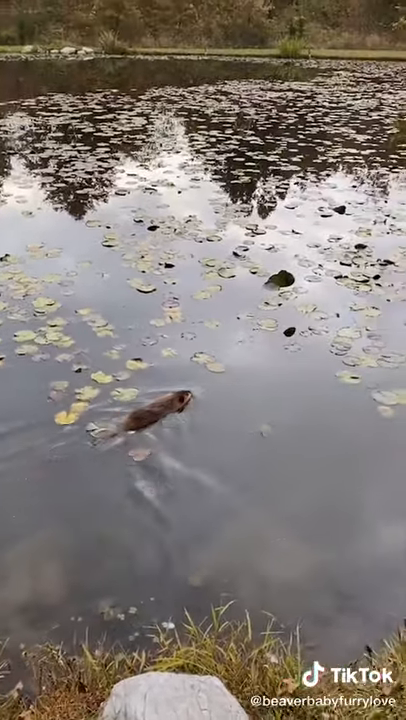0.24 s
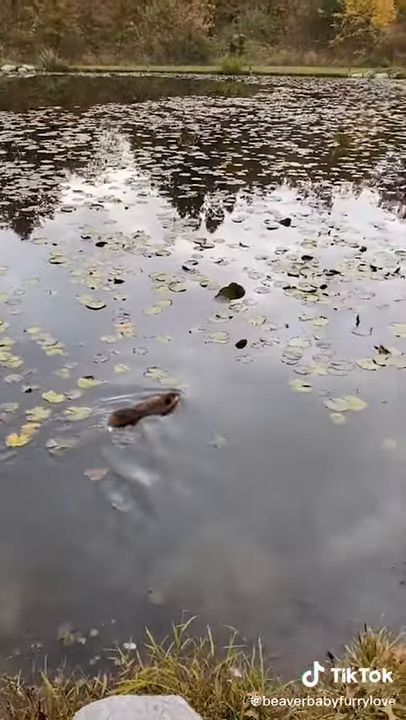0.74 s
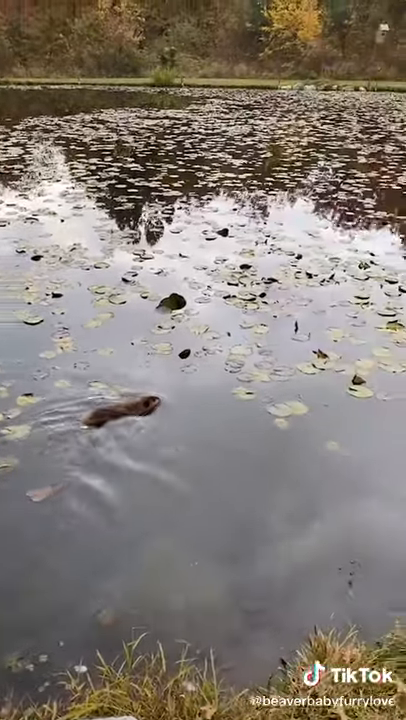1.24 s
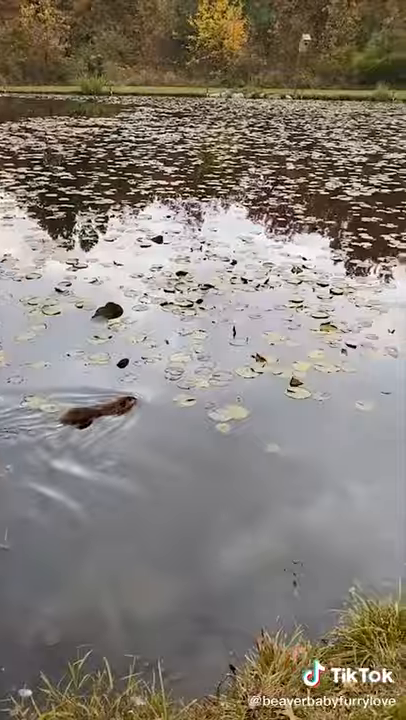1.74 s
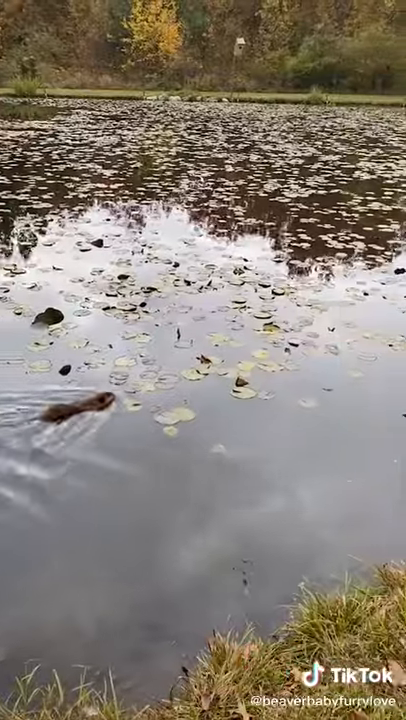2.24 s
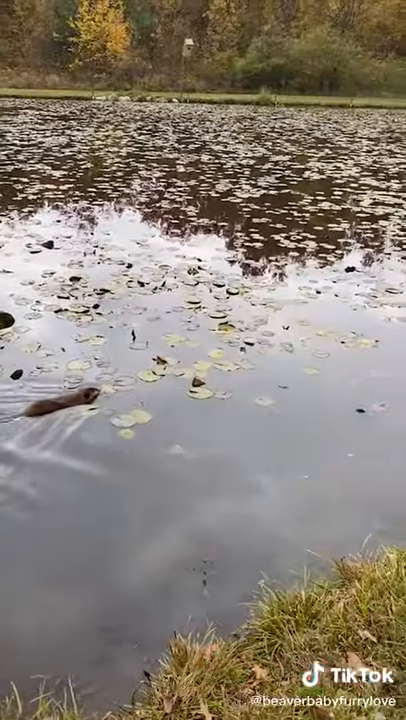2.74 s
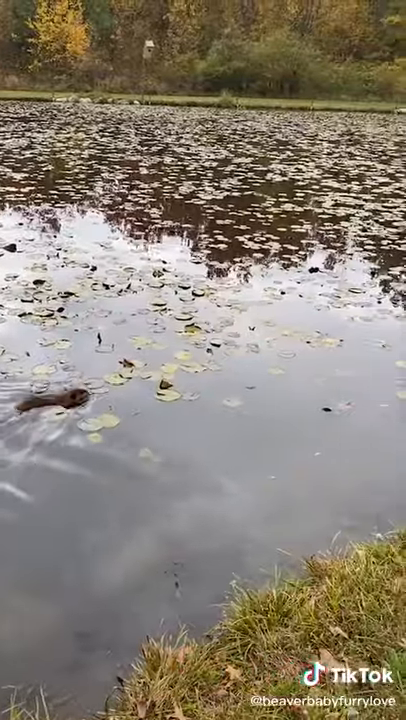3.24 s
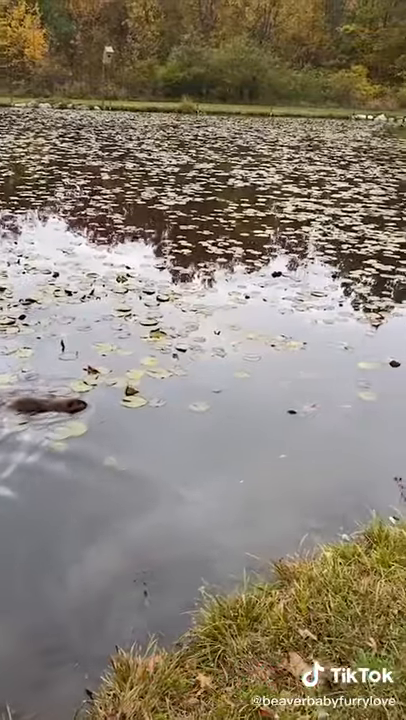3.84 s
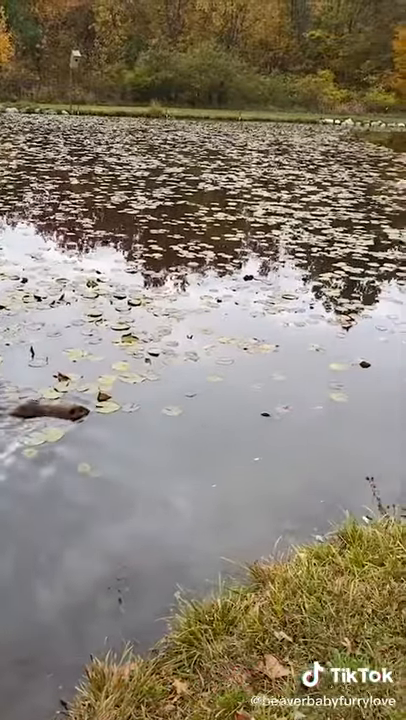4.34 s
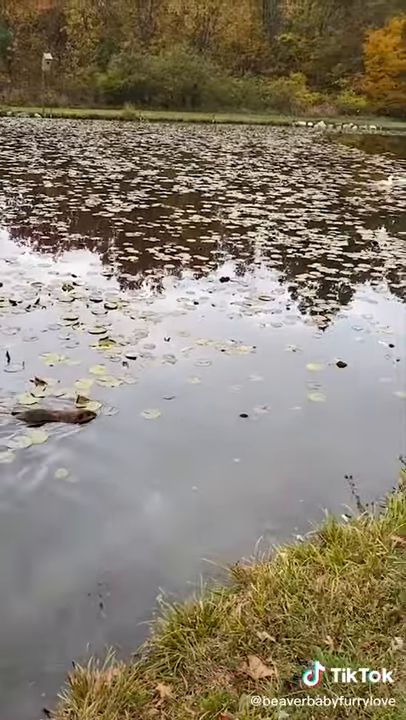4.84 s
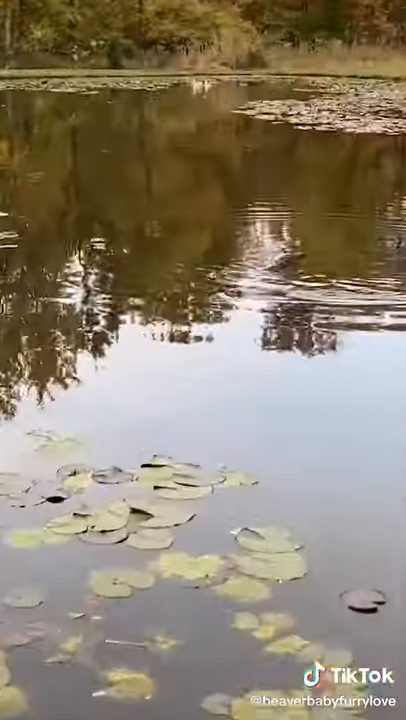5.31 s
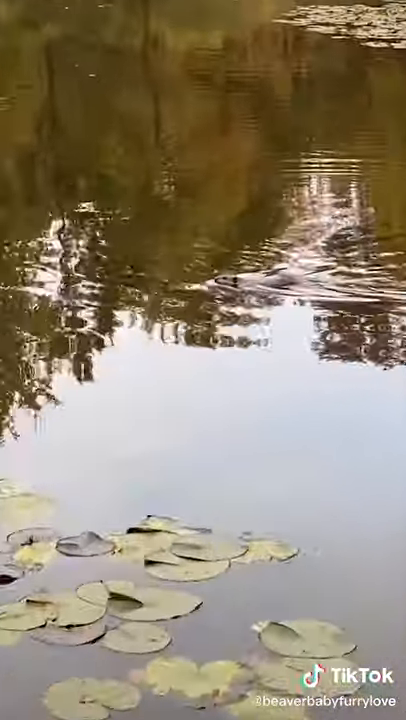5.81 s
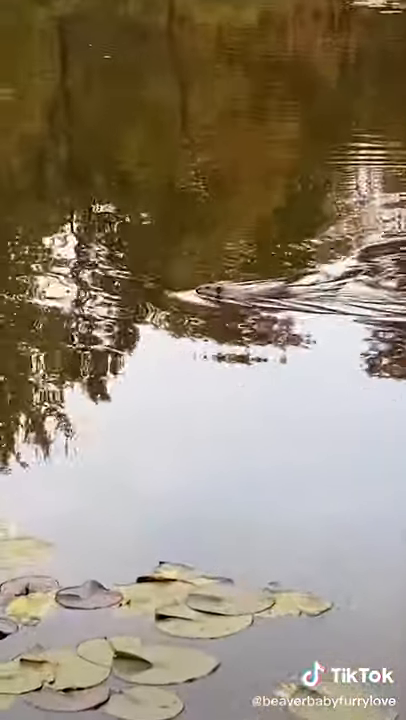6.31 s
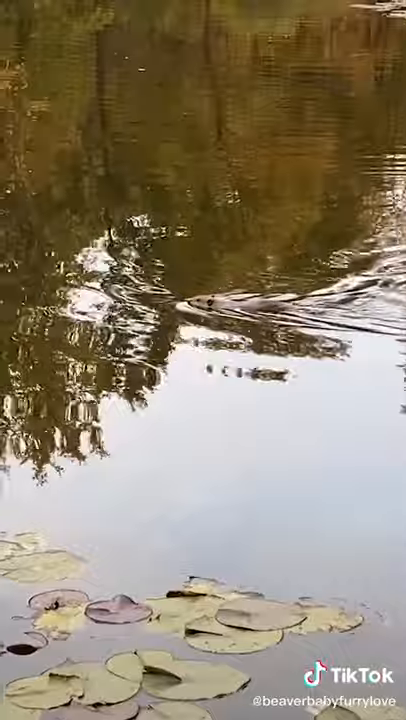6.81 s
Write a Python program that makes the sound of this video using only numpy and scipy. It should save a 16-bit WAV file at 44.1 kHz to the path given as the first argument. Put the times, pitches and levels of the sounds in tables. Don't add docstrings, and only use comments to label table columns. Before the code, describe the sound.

Low road rumble and engine drone beside a pond with faint birds and handling thumps, then a tiny gap and a much quieter view.

```python
import sys
import numpy as np
from scipy import signal
from scipy.fft import rfft, irfft, next_fast_len
from scipy.io import wavfile
from scipy.ndimage import uniform_filter1d, map_coordinates

SR = 44100
rng = np.random.default_rng(int(sys.argv[2]) if len(sys.argv) > 2 else 0)


def transcribe(signal):
    frames = np.atleast_2d(signal).T
    limited = np.clip(frames, -1, 1)
    pcm = np.round(limited * 32767).astype(np.int16)
    wavfile.write(sys.argv[1], SR, pcm)


def volts_from_db(level):
    exponent = np.asarray(level, float) / 20
    return 10 ** exponent


N = 311346
TIME = np.arange(N) / SR
CUT, RESUME = 4.8977, 4.964

# hz, side_over_mid_db, tilt_left (part of the side), lead_left (part
PORTS_FIRST = [(61, -38.5, 0.034, 0.061), (125, -23.5, -0.057, 0.0065), (303, -7.5, 0.3, 0.17),
               (520, -0.5, -0.49, 0.23), (870, 2.5, 0.54, 0.5), (1450, -4, 0.43, 0.18), (2400, 2, -0.25, 1),
               (6560, 0, 0.15, .2), (9900, -3, 0.0087, 0.11), (10200, -24.5, 0.047, 0.06),
               (11000, -10, 0.0013, 0.063), (11500, -3, -0.14, 0.036)]
PORTS_SECOND = [(59.3, -18.5, -0.59, 0.027), (168, -18, -1.1, 0), (296, -8, -0.57, 0.18),
                (500, -8, 0.29, 0.057), (1400, -1, -0.11, 0.22), (3400, -18, 0.1, 0.022),
                (8000, -15, -0.3, 0.036), (8360, 21.5, -0.085, 0), (9800, 23, 0, 0), (10200, -28, 0, 0)]


def unit(x):
    return x / np.sqrt(np.mean(x ** 2) + 1e-20)


def along(points, hz):
    f, *cols = np.transpose(points)
    return [np.interp(np.log(hz + 1), np.log(f + 1), c) for c in cols]


def curves(rows):
    s, *cols = np.transpose(rows)
    return [np.interp(TIME, s, c) for c in cols]


def wobble(rate):
    knots = rng.standard_normal(int(N * rate / SR) + 4)
    return map_coordinates(knots, [TIME * rate])


def add(out, s, x):
    part = out[:, round(s * SR):][:, :x.shape[1]]
    part += x[:, :part.shape[1]]


def placed(rows, late_us):
    return [(*row, late_us[row[0] > CUT]) for row in rows]


def rush(spectrum, ports, patchy_db):
    z = signal.stft(rng.standard_normal((2, N + 512)), nperseg=512)[2]
    field = uniform_filter1d(rng.standard_normal(z.shape[1:]), size=5, axis=0)
    field = unit(uniform_filter1d(field, size=12, axis=1))
    patchy = signal.istft(z * volts_from_db(patchy_db * field), nperseg=512)[1][:, :N]
    size = next_fast_len(N + 8192)
    shared, own = rfft(patchy, size)
    hz = np.fft.rfftfreq(size, 1 / SR)
    outline = [(0.75, -120)] + list(spectrum) + [(SR / 2, -120)]
    colour = volts_from_db(along(outline, hz)[0]) * (hz <= spectrum[-1][0])
    side_db, tilt, lead = along(ports, hz)
    free = np.sqrt(np.clip(1 - tilt ** 2 - lead ** 2, 0, 1))
    difference = volts_from_db(side_db) * ((tilt + 1j * lead) * shared + free * own)
    mid, side = irfft(colour * [shared, difference], size)[:, :N]
    return np.array([mid + side, mid - side]) / np.std(mid)


def echoes(x, wet_db):
    # hz, decay_60db_s
    tree_decay = [(1500, 0.085), (5000, 0.59), (8000, 0.52), (14000, 0.67)]
    hz, t, z = signal.stft(rng.standard_normal((2, SR // 2)), SR, nperseg=256)
    decay_s = along(tree_decay, hz)[0][:, None]
    tail = signal.istft(z * volts_from_db(-60 * t / decay_s), SR, nperseg=256)[1]
    tail = 2.1 * tail[0] + 0.16 * tail[1] * np.array([[1], [-1]])
    wet = signal.fftconvolve(x, tail / np.linalg.norm(tail[0]), axes=1)
    return volts_from_db(wet_db) * wet + np.pad(x, ((0, 0), (0, wet.shape[1] - x.shape[1])))


def voice(pitch, late_us, overtone_db):
    lag = pitch * np.array([[0], [1]]) * late_us / 10 ** 6
    turn = 2 * np.pi * (np.cumsum(pitch) / SR - lag)
    octave = volts_from_db(overtone_db - 14 * (pitch - 6000) / 1000) * (pitch < SR / 5)
    return np.sqrt(2) * (np.sin(turn) + octave * np.sin(2 * turn))


def whistles(rows, bend, edge, rough, wet_db, overtone_db=-60):
    out, air = np.zeros((2, N)), wobble(300)
    for s, length, from_hz, to_hz, db, late_us in rows:
        u = np.linspace(0, 1, int(length * SR))
        way = (1 - np.exp(-bend * u)) / (1 - np.exp(-bend))
        pitch = from_hz + (to_hz - from_hz) * way
        shape = np.clip(np.minimum(u / edge, (1 - u) / 0.071), 0, 1)
        shape = shape * (1 + rough * air[round(s * SR):][:len(u)])
        add(out, s, echoes(volts_from_db(db) * shape * voice(pitch, late_us, overtone_db), wet_db))
    return out


def near_bird():
    # start_s, length_s, from_hz, to_hz, level_db, right_late_us
    chip = [
        (1.7415, 0.021, 5450, 7350, -39.5, 50),
    ]
    return volts_from_db(-1) * whistles(chip, bend=5.2, edge=0.035, rough=0.25, wet_db=-10, overtone_db=-14)


def swooping_bird():
    # start_s, length_s, to_hz, level_db, right_late_us
    swoops = [
        (3.385, 0.065, 8000, -81, 40),
        (4.207, 0.085, 6750, -71.5, 36),
        (5.186, 0.095, 7050, -82, 7),
    ]
    # after_swoop_s, length_s, from_hz and to_hz over the swoop's last pitch, level_db under it
    flick = [
        (-.014, .013, 0, 420, -4),
        (0, .022, 420, -50, -3),
        (.021, .008, 0, 950, -7),
        (.029, .02, 950, 0, -7),
    ]
    rows = [(s, length, 9500, hz, db, us) for s, length, hz, db, us in swoops]
    for s, length, hz, db, us in swoops:
        for later, short, up, down, under in flick:
            rows.append((s + length + later, short, hz + up, hz + down, db + under, us))
    return whistles(rows, bend=3.8, edge=0.15, rough=0.5, wet_db=-2)


def falling_birds():
    # start_s, length_s, from_hz, level_db
    fall_calls = [(1.04, 0.051, 4420, -71), (1.178, .075, 4180, -75), (1.83, 0.04, 4450, -80),
                  (2.05, 0.048, 4350, -85), (2.81, 0.022, 4950, -75), (2.85, 0.054, 4680, -77),
                  (3.855, 0.042, 4500, -80), (3.885, 0.049, 4550, -84), (3.982, 0.049, 4420, -77),
                  (4.03, .04, 3980, -76.5), (4.128, 0.055, 4220, -78.5), (4.151, 0.043, 4220, -78),
                  (4.17, .03, 4120, -81), (4.278, .046, 4480, -72.5), (4.419, 0.032, 4270, -80),
                  (4.435, .035, 3970, -77), (4.635, 0.05, 4350, -76), (4.785, 0.03, 3820, -77.5)]
    # start_s, pitch_hz, level_db of the stroke that starts there
    turns = [
        (6.612, 8760, -96),
        (6.645, 7500, -92),
        (6.668, 8770, -88),
        (6.715, 6336, -86),
        (6.742, 8270, -87),
        (6.782, 5700, -90),
    ]
    fall_hz_per_s = 18000
    rows = [(s, length, hz, hz - fall_hz_per_s * length, db) for s, length, hz, db in fall_calls]
    rows += [(s, end - s, hz, to_hz, db) for (s, hz, db), (end, to_hz, _) in zip(turns, turns[1:])]
    return whistles(placed(rows, (35, 3.3)), bend=.3, edge=.12, rough=.4, wet_db=-6)


def small_birds():
    # start_s, length_s, from_hz, to_hz, level_db (all three tables)
    hooks = [
        (.552, 0.029, 7200, 7640, -90),
        (.675, 0.086, 7700, 6500, -69),
        (1.634, 0.027, 6500, 7480, -56.5),
        (2.135, 0.033, 7500, 7230, -69),
        (2.745, 0.017, 6700, 6230, -68.5),
        (4.2, .035, 10700, 9200, -78.5),
        (5.738, 0.011, 4020, 4540, -84),
        (6.885, 0.019, 6800, 6500, -84.5),
    ]
    mews = [(1.85, 0.052, 2540, 2770, -73), (1.95, 0.046, 2620, 2400, -75), (2.46, .045, 2090, 2420, -74),
            (2.65, .025, 2210, 2630, -75), (2.17, 0.028, 7200, 8760, -81), (5.33, 0.055, 3200, 2100, -91),
            (3.59, 0.043, 1914, 2330, -74.5), (4.06, .07, 2300, 1960, -78), (4.32, 0.028, 2200, 2050, -74),
            (4.62, .04, 2450, 2350, -79), (4.755, .03, 2750, 2577, -76), (.905, 0.031, 3480, 4140, -76),
            (3.37, .07, 3090, 3400, -80), (5.805, 0.037, 3050, 2780, -86), (5.832, 0.038, 2840, 2660, -88),
            (6.14, 0.037, 2300, 1450, -90), (6.17, .035, 3150, 2950, -90), (6.21, 0.051, 2750, 2400, -87),
            (6.262, 0.044, 2380, 2000, -86), (6.3, .12, 1980, 2000, -96), (6.445, 0.024, 3100, 2550, -89),
            (6.72, 0.017, 4200, 3800, -96), (6.272, 0.028, 1670, 1485, -86), (6.345, 0.06, 1570, 1560, -92),
            (6.59, 0.046, 1850, 2570, -92), (6.77, 0.055, 2360, 2160, -90),
            (6.825, .028, 2170, 1890, -89.5), (6.922, 0.019, 2280, 2090, -89)]
    ticks = [(.11, .004, 6800, 3200, -77), (.28, .014, 5200, 2300, -79), (.6, .006, 11000, 7500, -79),
             (1.163, .006, 2500, 3600, -72), (1.672, .008, 7500, 5000, -77),
             (2.257, .004, 13500, 10000, -67), (2.38, .006, 6700, 7000, -78),
             (2.387, .005, 7400, 9700, -76), (2.392, .005, 7800, 9600, -74), (2.437, .007, 5000, 8200, -75),
             (2.44, .005, 6300, 7200, -76), (2.445, .008, 8500, 11200, -75), (2.49, .014, 7000, 7100, -78),
             (2.501, .006, 7600, 9200, -75), (2.506, .007, 7600, 10800, -75),
             (3.823, .003, 12000, 7500, -79), (5.016, .006, 1900, 250, -64)]
    out = whistles(placed(hooks, (70, -1.5)), bend=3.3, edge=0.52, rough=0.67, wet_db=-1.5)
    out += whistles(placed(mews, (75, 8)), bend=.3, edge=.25, rough=.45, wet_db=-1.5)
    return out + volts_from_db(-2.5) * whistles(placed(ticks, (30, 18)), bend=1.3, edge=0.13, rough=0.52, wet_db=-3.0)


def buzzing_birds():
    # start_s, length_s, centre_hz, level_db
    buzz_calls = [(0.085, 0.25, 5420, -84), (0.273, 0.19, 5600, -78.5), (.7, 0.51, 5410, -82.5),
                  (1.325, 0.17, 5194, -70.5), (1.846, 0.053, 2235, -74.5), (1.939, 0.063, 2260, -77.5),
                  (2.42, 0.083, 2080, -89), (2.645, 0.025, 2350, -82), (2.81, 0.067, 5270, -79.5),
                  (2.89, 0.095, 5370, -78), (3.899, 0.75, 5540, -89.5), (4.815, 0.089, 5440, -80.5),
                  (5.365, 0.1, 5520, -86), (6.29, 0.13, 1835, -100), (5.729, .15, 5340, -93.5),
                  (5.902, 0.24, 5470, -89), (6.556, 0.11, 5370, -86.5), (6.881, 0.053, 5440, -89.5)]
    swing_hz = 436
    out, jitter = np.zeros((2, N)), wobble(150)
    for s, length, hz, db, late_us in placed(buzz_calls, (37, 2.5)):
        t = np.arange(int(length * SR)) / SR
        swing = np.sin(2 * np.pi * 95 * t + 2.5 * jitter[round(s * SR):][:len(t)])
        shape = np.clip(np.minimum(t / 0.0084, (length - t) / 0.0096), 0, 1) * volts_from_db(-25 * t)
        call = volts_from_db(db) * shape * voice(hz + swing_hz * swing, late_us, overtone_db=-55.5)
        add(out, s, echoes(call, wet_db=2.0))
    return out


def crickets():
    # start_s, length_s, from_hz, to_hz, level_db
    songs = [(0.01, 0.44, 3514, 3400, -82), (0.385, 0.53, 3136, 3230, -83), (.52, 0.36, 3480, 3480, -87),
             (0.855, 0.91, 3486, 3433, -82), (1.66, .48, 3410, 3400, -81), (2.24, 0.72, 3505, 3540, -86),
             (2.45, 0.3, 3200, 3250, -90), (2.975, 0.45, 3310, 3230, -86.5), (3.45, 0.35, 3120, 3090, -85),
             (3.95, .94, 3424, 3455, -84), (5.76, 0.63, 3450, 3480, -94.5), (5.95, 0.46, 3270, 3130, -92),
             (6.635, 0.44, 3470, 3520, -94.5)]
    edge_s, chirr_per_s, sharpness = 0.031, 26, 1.4
    out, blur, fade = np.zeros((2, N)), wobble(260), wobble(6)
    for s, length, from_hz, to_hz, db, late_us in placed(songs, (45, 2)):
        t = np.arange(int(length * SR)) / SR
        here = slice(round(s * SR), round(s * SR) + len(t))
        t = t[:len(blur[here])]
        pulse = np.sin(np.pi * chirr_per_s * t + .3) ** 2
        shape = np.clip(np.minimum(t, length - t) / edge_s, 0, 1) * pulse ** sharpness
        shape = shape * volts_from_db(db + 4.5 + 2.7 * fade[here])
        pitch = from_hz + (to_hz - from_hz) * t / length + 72 * blur[here]
        add(out, s, echoes(shape * voice(pitch, late_us, overtone_db=-60.0), wet_db=0.0))
    return out


def hand():
    # centre_s, peak_db, pitch_hz, length_s, direction
    bumps = [
        (.876, -29.5, 109, 0.011, -1.16),
        (3.377, -32.5, 89, 0.032, -1.67),
        (3.413, -25, 61, 0.038, -1.1),
        (3.572, -26, 62, 0.076, 0.87),
        (4.125, -22, 164, 0.039, 0.3),
        (4.15, -33, 125, 0.07, -0.7),
    ]
    # hz, level_db (per Hz)
    brush = [(300, 3), (1500, 7), (4000, 2.5), (7500, 4), (9000, -7), (11000, 5), (13300, -20.5),
             (15000, -0.5), (15700, -8.5), (16000, -49)]
    out = np.zeros((2, N))
    for s, db, hz, length, sign in bumps:
        t = np.arange(int(length * SR)) / SR - length / 2
        push = sign * volts_from_db(db) * np.cos(np.pi * t / length) ** 2 * np.cos(2 * np.pi * hz * t)
        add(out, s - length / 2, push * np.array([[1.04], [.96]]))
    stroke_db = np.interp(TIME, [4.96, 4.99, 5.035, 5.07, 5.11, 5.14], [-75, -78.5, -77.5, -78.0, -100, -140])
    stroke = volts_from_db(stroke_db + 2.2 * wobble(53)) * rush(brush, [(500, -0.5, -0.3, 0)], patchy_db=4.0)
    return out + (TIME > CUT) * stroke


def note(rows, width):
    hz, db = curves(rows)
    turn = 2 * np.pi * np.cumsum(hz) / SR
    return volts_from_db(db) * (wobble(width) * np.sin(turn) + wobble(width) * np.cos(turn))


def motors():
    # time_s, pitch_hz, level_db (all three tables)
    engine = [(0, 71.77, -48.5), (1, 69.92, -49), (2.45, 73.27, -74), (2.6, 104.3, -44), (3, 96.9, -52),
              (3.3, 90.14, -55.5), (4.25, 90.37, -48), (4.4, 94.1, -41.5), (4.9, 93.74, -46),
              (4.95, 89.76, -63), (5.9, 110, -66.5), (6.15, 113.5, -62.5), (7.06, 120.5, -59.5)]
    hum = [(0, 353.3, -70.5), (2.8, 349.2, -65.5), (3.4, 348.5, -84.5), (4.9, 351.5, -60), (4.95, 344, -99)]
    swell = [(4.9, 226, -99), (5, 226, -73.5), (6.55, 224, -71.5), (6.75, 226, -57), (7.06, 222.1, -58.5)]
    return note(engine, width=22) + note(hum, width=7) + note(swell, width=60) * volts_from_db([[-1.5], [1.5]])


def road(view):
    # rumble_db, drone_db, roar_db
    road_levels = [
        (-43.5, -60.5, -64),
        (-56, -70.5, -84.5),
    ]
    # hz, level_db (per Hz)
    rumble_first = [(15, -40.5), (25, -9), (54, -1.5), (75, 5), (94, -0.5), (150, -12), (200, -49.5),
                    (330, -120)]
    rumble_second = [(15, -57), (25, -25), (37, -23), (53, -6), (75, -6.5), (123, -9.5), (150, -25),
                     (200, -48), (330, -120)]
    drone_first = [(88, -31.5), (150, 3), (312, -6.5), (350, -14.5), (376, -8.5), (550, -24), (720, -55.5),
                   (1210, -120)]
    drone_second = [(88, -24.5), (150, 3), (226, -2), (312, -8), (339, -18.5), (550, -25), (720, -54),
                    (1210, -120)]
    roar_first = [(320, -3), (550, -5), (1320, -2.5), (1730, -11.5), (2160, -16.5), (2800, -26.5),
                  (3640, -65), (6160, -120)]
    roar_second = [(320, -3.5), (550, -7.5), (789, -7.5), (1160, -16.5), (1370, -18), (2800, -21.5),
                   (3640, -63), (6160, -120)]
    # hz, level_db (per Hz)
    slap = [(750, -26), (1000, 0.5), (1450, -9.5), (1900, -31.5)]
    # time_s, level_db
    traffic = [(0, -2), (1, -1), (2.2, 0.7), (3.3, 0.5), (4.1, 2), (4.9, 4), (4.96, 2), (5.7, 1.5),
               (6.3, 0), (7.06, 1.5)]
    # centre_s, length_s, heave_db, tyre_db
    loads = [(0.455, 0.17, 0.5, 9.5), (0.563, 0.22, -7, -6.5), (0.853, 0.19, 4.5, -10),
             (1.05, 0.048, -2, 2), (1.712, 0.14, -4, 10), (2.34, 0.73, -4, -2), (3.374, 0.16, 4.5, 10),
             (3.548, 0.079, 9, 6.5), (3.668, 0.13, -7, -0.5), (3.975, 0.13, -9, 4.5), (4.047, 0.15, 5.5, 6),
             (4.72, 0.12, -1, 6.5), (4.128, 0.14, 8.5, 3), (4.383, 0.24, -9, 0.7), (5.025, 0.064, 6.5, 1),
             (5.096, 0.14, -13, 3), (5.365, 0.15, 4.5, -0.5), (5.46, 0.088, -3.5, -6), (5.57, 0.064, 4, 2),
             (5.644, 0.11, -8, 4), (6.155, 0.08, 8, 3)]
    rumble = (rumble_first, rumble_second)[view]
    drone = (drone_first, drone_second)[view]
    roar = (roar_first, roar_second)[view]
    ports = (PORTS_FIRST, PORTS_SECOND)[view]
    base_rumble_db, base_drone_db, base_roar_db = road_levels[view]
    busy_db, = curves(traffic)
    heave_db, tyre_db = np.zeros((2, N))
    for s, length, heave, tyre in loads:
        passing = np.cos(np.pi * np.clip((TIME - s) / length, -.5, .5)) ** 2
        heave_db += heave * passing
        tyre_db += tyre * passing
    rumble_db = base_rumble_db + 0.11 * busy_db + heave_db
    drone_db = base_drone_db + 0.8 * busy_db + 0.29 * heave_db + 2.1 * wobble(9)
    roar_db = base_roar_db + busy_db + 0.38 * tyre_db + .5 * wobble(7)
    out = volts_from_db(rumble_db - 0.5) * rush(rumble, ports, patchy_db=1.52)
    out = out + volts_from_db(base_roar_db - 4.5) * (volts_from_db(tyre_db) - 1) * rush(slap, ports, patchy_db=1.5)
    out = out + volts_from_db(drone_db + 3.0) * rush(drone, ports, patchy_db=0.1)
    return out + volts_from_db(roar_db + 0.39) * rush(roar, ports, patchy_db=2.5)


def air(view):
    # hz, level_db (per Hz)
    air_first = [(2400, -32), (2800, 0), (4500, -4), (6600, -8), (8500, -10), (12350, -11.5),
                 (12550, -39.5), (15500, -33)]
    air_second = [(2400, -10), (2800, 8.5), (4500, 6.5), (6500, 5), (8200, -1), (8450, -17.5), (9700, -22),
                  (10200, 5.5), (11500, -4), (12000, -21), (12300, -70)]
    if view == 0:
        return volts_from_db(-81.5) * rush(air_first, PORTS_FIRST, patchy_db=1.3)
    return volts_from_db(-91.5) * rush(air_second, PORTS_SECOND, patchy_db=3.5)


def cancelled(x):
    # hz, level_db
    notch = [(6700, 0), (7100, -38), (8150, -8.5), (8450, -1)]
    size = next_fast_len(N + 8192)
    loss = volts_from_db(along(notch, np.fft.rfftfreq(size, 1 / SR))[0])
    mid = irfft(rfft(x.mean(axis=0), size) * loss, size)[:N]
    return x - x.mean(axis=0) + mid


def starved(x):
    # start_s, end_s, from_hz, to_hz (both tables)
    lost_mid = [(.64, 1.63, 6750, 8200), (1.655, 1.738, 7800, 9700), (1.75, 1.81, 7800, 10800),
                (1.81, 1.93, 7200, 9700), (1.85, 2.2, 12600, 16000), (1.775, 1.85, 13200, 13900),
                (0, .57, 6750, 8200), (1.778, 1.82, 7400, 8000), (1.93, 2.135, 6950, 8200),
                (2.7, 3.38, 6850, 8150), (3.84, 4.2, 6850, 8150), (4.87, 4.96, 12500, 16000),
                (4.95, 5.1, 12800, 13800), (5, 5.06, 8500, 9600), (5.16, 5.5, 8650, 9600),
                (2.458, 2.488, 7100, 8200), (2.52, 2.7, 6900, 8100), (4.29, 4.32, 7500, 9400),
                (4.35, 4.4, 7000, 7500), (4.4, 4.88, 6900, 8150)]
    lost_side = [
        (1.64, 1.738, 8100, 11100),
        (1.75, 2.02, 8000, 11200),
        (1.86, 2.2, 12600, 16000),
        (4.26, 4.345, 9100, 11400),
    ]
    lost_db, ragged_hz = -21, 150
    both = np.array([x[0] + x[1], x[0] - x[1]]) / 2
    hz, t, z = signal.stft(both, SR, nperseg=256)
    hz, blocks = hz[:, None], np.arange(len(t)) // 8
    low_rag, high_rag = ragged_hz * rng.standard_normal((2, len(t)))[:, blocks]
    lost = np.zeros(z.shape, bool)
    for gone, rows in zip(lost, (lost_mid, lost_side)):
        for s, end, lo, hi in rows:
            gone |= (t > s) & (t < end) & (hz > lo + low_rag) & (hz < hi + high_rag)
    chance = rng.random((len(hz), len(t)))[np.arange(len(hz)) // 3][:, blocks]
    chance = chance * volts_from_db(5.5 * rng.standard_normal(len(t))[blocks // 2])
    lost[0] |= (t > RESUME + .15) & (hz > 9600) & (hz < 12200) & (chance > .16)
    mid, side = signal.istft(z * volts_from_db(lost_db * lost), SR, nperseg=256)[1][:, :N]
    return np.array([mid + side, mid - side])


def scene():
    first = cancelled(road(0) + air(0)) + near_bird()
    second = road(1) + air(1)
    birds = swooping_bird() + falling_birds() + small_birds() + buzzing_birds()
    return np.where(TIME < RESUME, first, second) + birds + crickets() + hand() + motors()


def top_cut(x):
    return signal.sosfilt(signal.butter(12, 15600, fs=SR, output="sos"), x)


def record(dry):
    ports = signal.sosfilt(signal.butter(4, 36, "high", fs=SR, output="sos"), dry)
    residue = volts_from_db(-41.0 - 1700 * (TIME - CUT).clip(0))
    stop = np.clip((CUT - TIME) / 0.000097, 0, 1)
    resume = np.clip((TIME - RESUME) / 0.012, 0, 1)
    gate = np.maximum.reduce([stop, residue, resume])
    return top_cut(gate * starved(ports))


dry = scene()
out = record(dry)
transcribe(out)
```